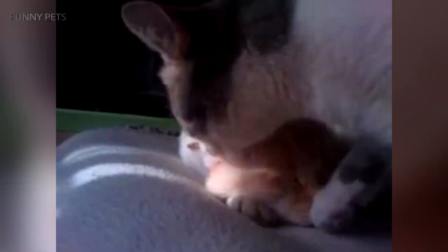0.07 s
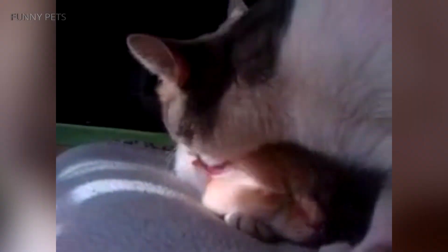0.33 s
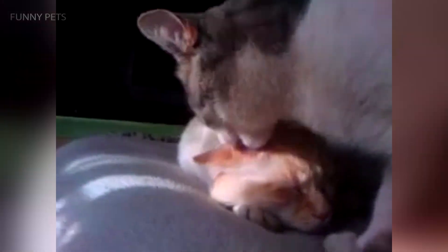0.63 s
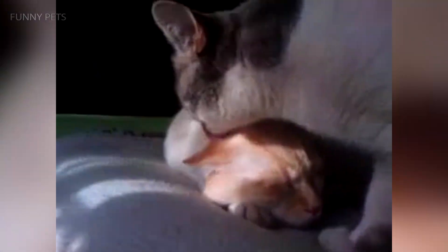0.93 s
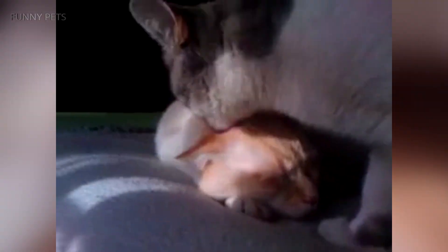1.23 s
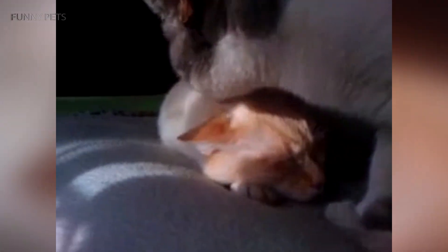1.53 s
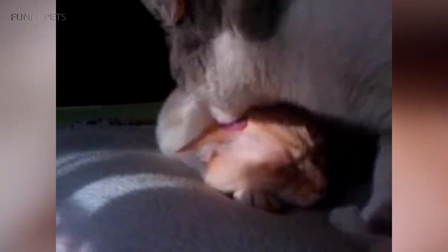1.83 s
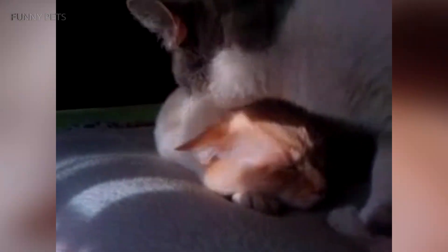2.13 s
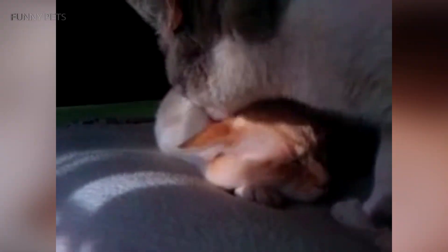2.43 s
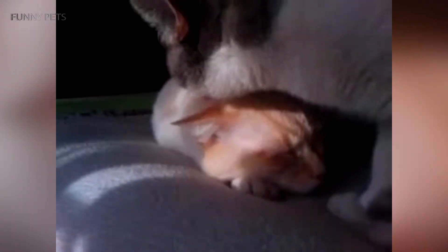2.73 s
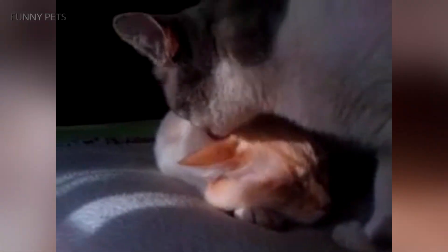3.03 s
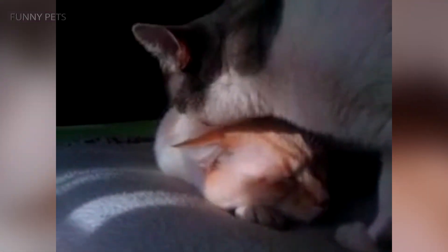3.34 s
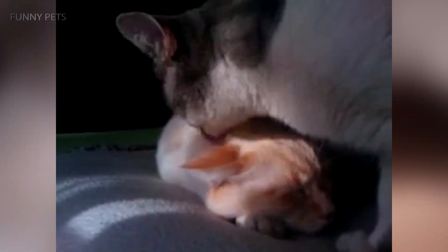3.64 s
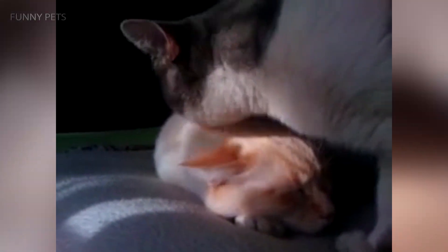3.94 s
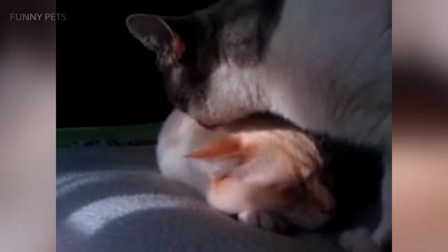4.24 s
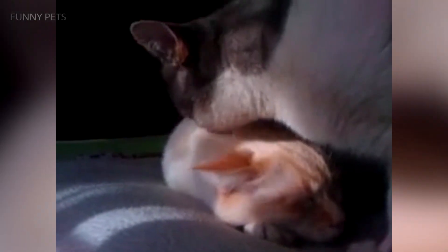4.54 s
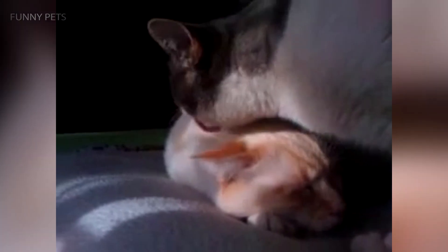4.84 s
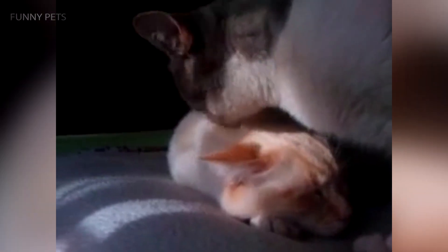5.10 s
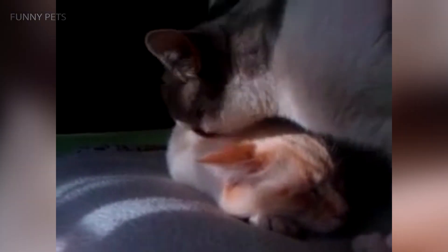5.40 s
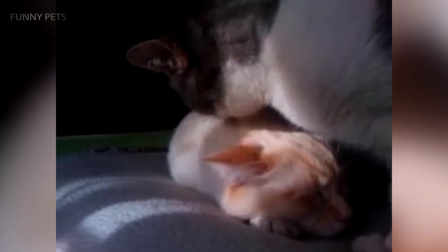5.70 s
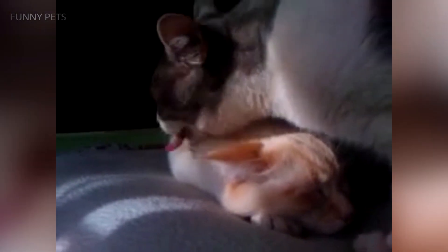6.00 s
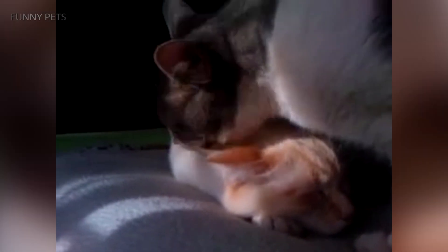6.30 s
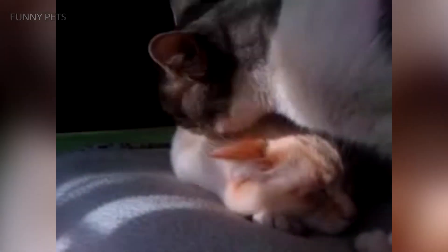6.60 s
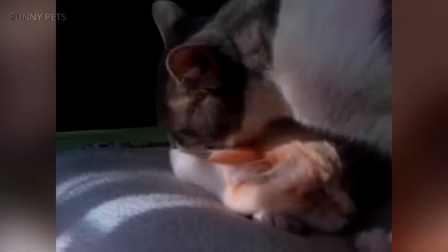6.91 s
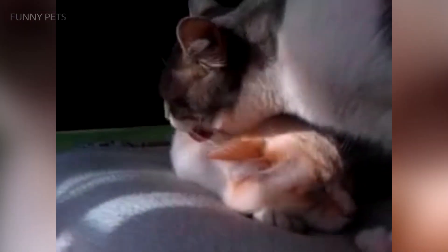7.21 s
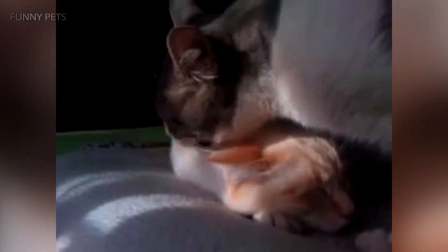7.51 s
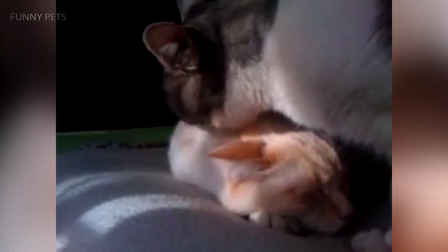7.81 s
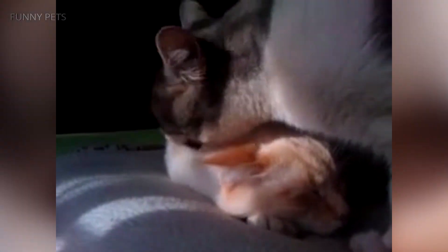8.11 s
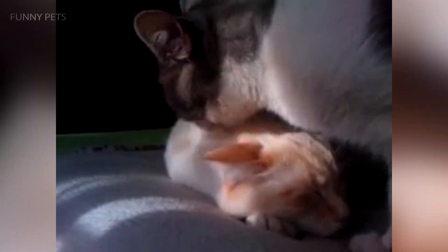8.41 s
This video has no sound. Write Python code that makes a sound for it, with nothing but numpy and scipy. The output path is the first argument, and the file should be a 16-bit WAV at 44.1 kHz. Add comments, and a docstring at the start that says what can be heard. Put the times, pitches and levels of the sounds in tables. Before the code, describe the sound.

A fan-like rush of air and a low fluttering drone, with a cat faintly licking a kitten and a few wet ticks.

```python
"""A steady rush of air, as from a fan, fills the room, with a hollow, fluttering drone near 340 Hz.
The rush is turbulent noise coloured by resonances; the drone is a cluster of low modes that beat.
Under it a cat licks a kitten on a cushion: the tongue rasps faintly as hairs slip off its barbs,
the muzzle rubs the coat, and films of saliva snap in a few wet ticks.
A close microphone passes only a narrow voice band."""
import sys
import numpy as np
from scipy import signal
from scipy.fft import rfft, irfft
from scipy.io import wavfile
from scipy.ndimage import uniform_filter1d

SR = 44100
rng = np.random.default_rng(int(sys.argv[2]) if len(sys.argv) > 2 else 0)


def store_pcm(level_fs):
    """Save levels as 16-bit WAV."""
    pcm = np.round(np.clip(level_fs, -1, 1) * 32767).astype(np.int16)
    wavfile.write(sys.argv[1], SR, np.atleast_2d(pcm).T)


N = 377055
TIME = np.arange(N) / SR
HZ = np.fft.rfftfreq(N, 1 / SR)


def air_rush(level_db=-34, middle_hz=1300, middle_width_hz=850, patch_s=.07, patch_hz=430):
    """Turbulence makes broadband noise, coloured by fixed resonances and modulated at random."""
    # spectral envelope of the rush: (frequency [Hz], relative level [dB])
    envelope = [(25, -33.5), (62, -15), (100, -12.5), (195, -10.5), (270, -1), (500, -2), (720, -3),
                (1400, -4.5), (1850, -5), (2100, -11), (2750, -17), (3330, -19), (3900, -34), (4700, -44.5)]
    # resonances that stand out of it: (frequency [Hz], bandwidth [Hz], lift [dB])
    peaks = [(485, 67, 2.5), (540, 17, 4), (1001, 140, 3.5), (1170, 150, 2.5), (1603, 90, 5),
             (2283, 210, 4), (3370, 380, 3), (4620, 660, 5.5)]
    hz, db = np.transpose(envelope)
    colour_db = np.interp(np.log(HZ + 1), np.log(hz), db)
    colour_db += sum(lift * resonance(HZ, centre, width) for centre, width, lift in peaks)
    f, t, spectra = signal.stft(noise(gain_of(colour_db)), SR, nperseg=512, noverlap=384)
    # eddies: each lifts or sinks a narrow band for a moment
    patches = uniform_filter1d(rng.standard_normal(spectra.shape), round(patch_s / t[1]), axis=1)
    patches_db = 1.3 * unit_rms(uniform_filter1d(patches, round(patch_hz / f[1]), axis=0))
    middle = np.exp(-((f - middle_hz) / middle_width_hz) ** 4)[:, None]
    treble = np.clip((f - middle_hz) / (2 * middle_width_hz), 0, 1)[:, None]
    waver_db = .5 * np.interp(t, TIME, wander(rate_hz=22))
    flicker_db = np.interp(t, TIME, wander(rate_hz=22))
    spectra *= gain_of(middle * waver_db + treble * flicker_db + patches_db)
    _, air = signal.istft(spectra, nperseg=512, noverlap=384)
    return gain_of(level_db) * unit_rms(air[:N])


def drone(trim_db=-2.5, throb_hz=13.8, throb_width_hz=3, throb_depth=0.29):
    """Beating: turbulence excites closely spaced modes, which flutter; a loose throb modulates them."""
    # low resonances: (frequency [Hz], bandwidth [Hz], relative level [dB])
    modes = [(252, 28, -10.5), (303.3, 35, -4), (324.3, 14, -0.5), (351.2, 23, 3), (392.6, 30, -3.5)]
    # slow swell of the drone: (time [s], level before trim [dB])
    swell = [(0.0, -37.5), (0.5, -41), (1.17, -34.5), (1.62, -40), (2.6, -36.5), (3.33, -37.5),
             (3.85, -35.5), (4.0, -31.5), (4.12, -36.5), (4.33, -36.5), (4.8, -39.0), (5.7, -37.5),
             (6.25, -34), (7.15, -40), (7.72, -34.5), (8.0, -35), (8.55, -40)]
    power = sum((gain_of(db) * resonance(HZ, hz, width)) ** 2 for hz, width, db in modes)
    ring = noise(np.sqrt(power))
    ring *= 1 + throb_depth * noise(resonance(HZ, throb_hz, throb_width_hz))
    # even out the level over about 0.2 s, keeping the quick flutter
    ring /= np.sqrt(uniform_filter1d(ring ** 2, size=9000))
    return gain_of(trim_db + np.interp(TIME, *np.transpose(swell))) * ring


def tongue_licks(hairs_per_s=1100, width_hz=1100, trim_db=-2.0):
    """Stick-slip friction: hairs slip off the tongue's barbs, a swarm of tiny clicks in each stroke."""
    # tongue strokes: (midpoint time [s], duration [s], level before trim [dB], rasp frequency [Hz])
    strokes = [(0.298, 0.13, -39.5, 2440), (0.407, 0.25, -41, 2630), (0.563, 0.25, -42.5, 2480),
               (0.71, 0.2, -42, 2660), (0.87, 0.23, -44.5, 2400), (1.063, 0.14, -40.5, 2430),
               (1.74, 0.45, -45, 2600), (2.328, 0.033, -38.5, 2450), (2.404, 0.05, -38, 2470),
               (2.915, 0.052, -34, 2470), (3.11, 0.061, -36, 2550), (3.19, 0.043, -35, 2450),
               (4.105, 0.056, -38, 2700)]
    slip_spectrum = rfft(impulses(hairs_per_s, spread_db=2, max_db=8))
    out = np.zeros(N)
    for s, length, db, hz in strokes:
        rasp = unit_rms(irfft(slip_spectrum * resonance(HZ, hz, width_hz), N))
        out += gain_of(db + trim_db) * stroke_pressure(s, length) * rasp
    return out


def muzzle_rubs(centre_hz=1120, width_hz=1140, trim_db=1.0):
    """Sliding friction of muzzle on coat makes dull noise whose amplitude follows the pressure."""
    # presses of the muzzle: (midpoint time [s], duration [s], level before trim [dB])
    presses = [(0.333, 0.19, -41), (0.75, 0.26, -42), (1.037, 0.23, -37), (3.463, 0.13, -36),
               (3.71, .09, -37), (7.897, 0.1, -35)]
    pressure = sum(gain_of(db) * stroke_pressure(s, length) for s, length, db in presses)
    return gain_of(trim_db) * pressure * noise(resonance(HZ, centre_hz, width_hz) ** 2)


def mouth_ticks(t60_s=0.01, rise_s=0.00024, spray_edge_hz=1800, trim_db=-2):
    """Damped oscillation: a film of saliva snaps with a tiny spray and briefly rings the mouth."""
    # snaps: (time [s], level before trim [dB], frequency [Hz], spray amplitude [ratio])
    snaps = [(0.378, -18.5, 3030, 0.7), (0.911, -30, 2660, 0.7), (0.963, -23.5, 2650, .22),
             (2.321, -27, 2340, .3), (2.9007, -27, 2380, .45), (2.921, -24, 2400, .45),
             (3.185, -33, 2330, .4), (7.5367, -28, 2260, 0.4)]
    t, out = np.arange(SR // 20) / SR, np.zeros(N)
    fade = (1 - np.exp(-t / rise_s)) * np.exp(-np.log(1000) * t / t60_s)
    high_pass = signal.butter(2, spray_edge_hz, "high", fs=SR, output="sos")
    for s, db, hz, spray_gain in snaps:
        ring = np.sin(2 * np.pi * hz * t)
        spray = spray_gain * signal.sosfilt(high_pass, rng.standard_normal(len(t)))
        add(out, s, gain_of(db + trim_db) * fade / fade.max() * (ring + spray))
    return out


def fur_crackle(level_db=-55, clicks_per_s=90, centre_hz=2300, width_hz=1800):
    """Shot noise: single damp hairs click at random, a faint crackle throughout."""
    click_spectrum = rfft(impulses(clicks_per_s, spread_db=8, max_db=24))
    crackle = irfft(click_spectrum * resonance(HZ, centre_hz, width_hz) ** 2, N)
    return gain_of(level_db) * unit_rms(crackle)


def fur_absorption(x, edge_hz=3600):
    """Porous absorption: fur soaks up the treble of the grooming."""
    return signal.sosfilt(signal.butter(4, edge_hz, fs=SR, output="sos"), x)


def fan_hum(drift_hz=1.496, rate_hz=4, flutter_depth=0.33):
    """Random frequency and amplitude modulation make the fan's faint tones waver."""
    # tones of the fan: (frequency [Hz], level [dB])
    tones = [(243, -55.5), (340.5, -51), (385.5, -53)]
    out = np.zeros(N)
    for hz, db in tones:
        cycles = np.cumsum(hz + drift_hz * wander(rate_hz)) / SR
        amplitude = 1 + flutter_depth * wander(rate_hz)
        out += gain_of(db) * unit_rms(amplitude * np.sin(2 * np.pi * cycles))
    return out


def stroke_pressure(s, length):
    """Contact pressure rises and falls in a half-cosine arch centred on time s."""
    return np.cos(np.pi * np.clip((TIME - s) / length, -.5, .5))


def impulses(per_s, spread_db, max_db):
    """A Poisson process: independent clicks of random sign and size."""
    db = np.minimum(spread_db * rng.exponential(1, N), max_db)
    return gain_of(db) * rng.choice([-1, 1], N) * (rng.random(N) < per_s / SR)


def resonance(hz, centre_hz, width_hz):
    """Lorentzian resonance curve, 1 at its centre."""
    return 1 / (1 + (2 * (hz - centre_hz) / width_hz) ** 2)


def noise(gain):
    """Spectral shaping: white noise weighted by a gain at each frequency, at rms 1."""
    return unit_rms(irfft(rfft(rng.standard_normal(N)) * gain, N))


def wander(rate_hz):
    """Random fluctuation of rms 1, band-limited to about the given rate."""
    return noise(np.exp(-(HZ / rate_hz) ** 2))


def low_pass(x, edge_hz, taps):
    """Steep linear-phase low-pass, centred so that it adds no delay."""
    return signal.oaconvolve(x, signal.firwin(taps, edge_hz, window=("kaiser", 8), fs=SR), "same")


def gain_of(db):
    """Decibels to amplitude."""
    return 10 ** (np.asarray(db) / 20)


def unit_rms(x):
    """Normalises to rms 1."""
    return x / np.sqrt(np.mean(x ** 2) + 1e-20)


def add(mix, s, sound):
    """Superposes a sound on the mix from time s."""
    part = mix[max(round(s * SR), 0):][:len(sound)]
    part += sound[:len(part)]


def scene():
    """Superposition: the room's air and the grooming sum at one microphone."""
    air = air_rush() + drone() + fan_hum()
    grooming = tongue_licks() + muzzle_rubs() + mouth_ticks() + fur_crackle()
    return (air + fur_absorption(grooming))[None]


def record(dry):
    """Band limiting: the microphone passes a voice band; the electronics add hiss and cut the top."""
    voice_band = low_pass(dry[0], edge_hz=4900, taps=301)
    hiss = gain_of(db=-76.5) * rng.standard_normal(N)
    return low_pass(voice_band + hiss, edge_hz=15700, taps=511)[None]


dry = scene()
out = record(dry)
store_pcm(out)
```